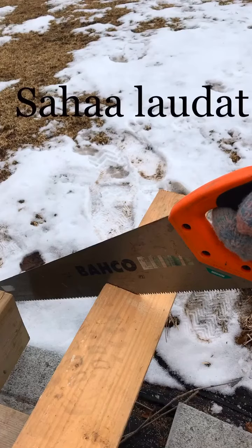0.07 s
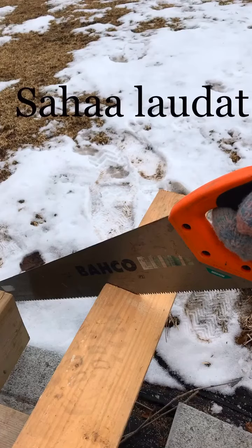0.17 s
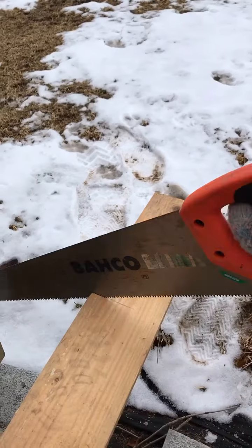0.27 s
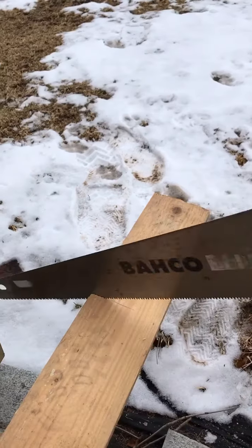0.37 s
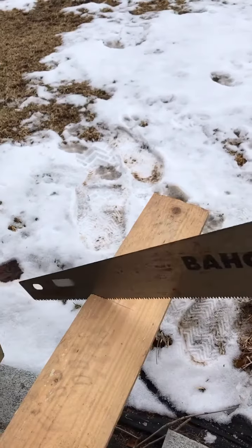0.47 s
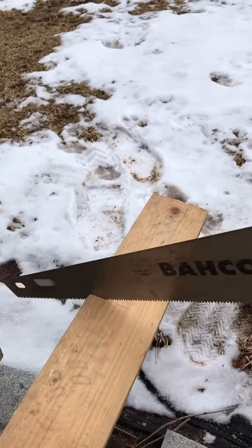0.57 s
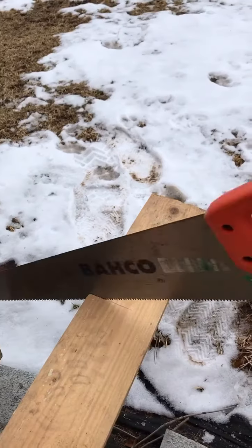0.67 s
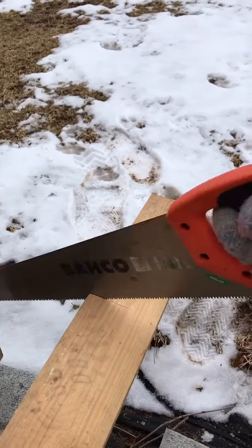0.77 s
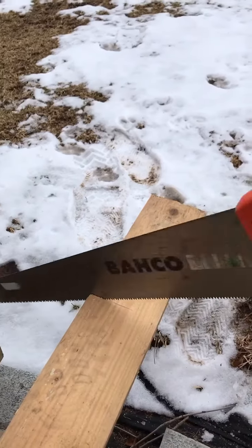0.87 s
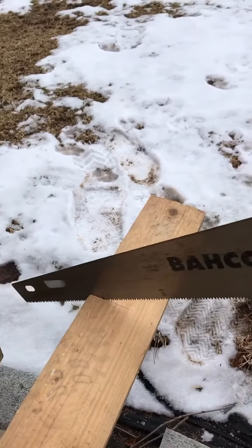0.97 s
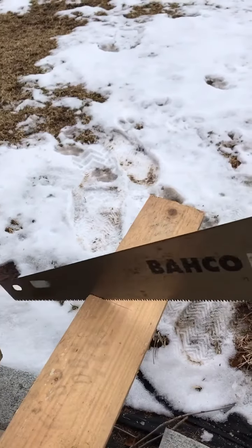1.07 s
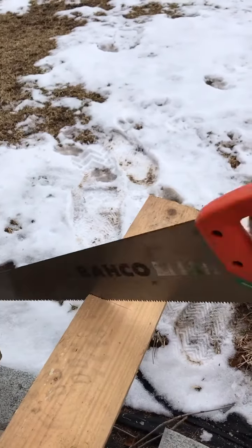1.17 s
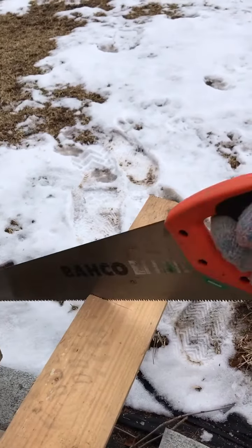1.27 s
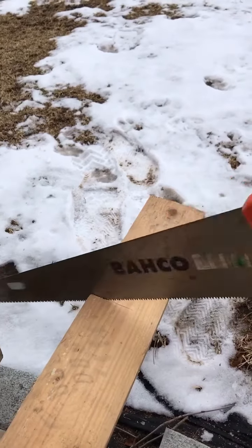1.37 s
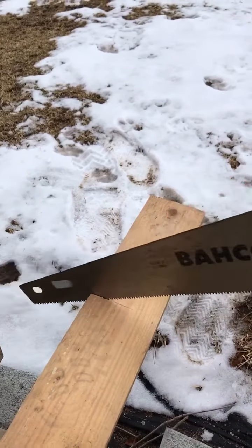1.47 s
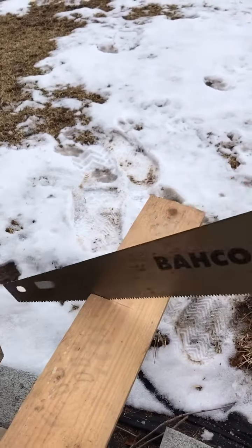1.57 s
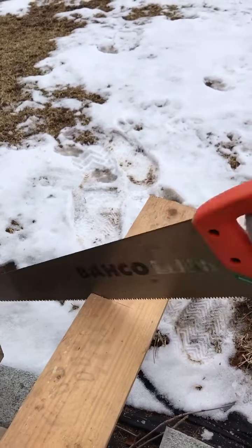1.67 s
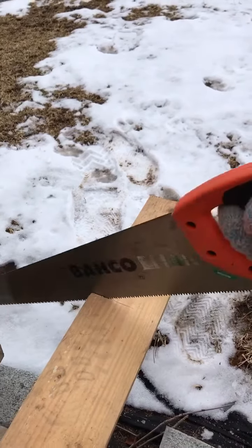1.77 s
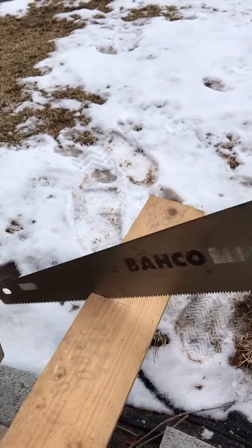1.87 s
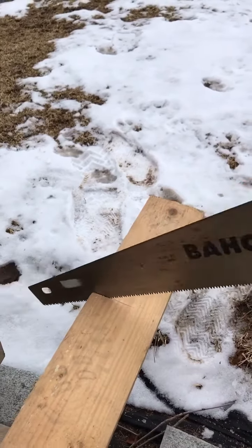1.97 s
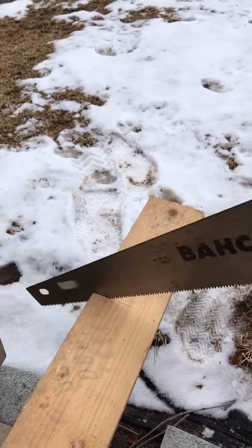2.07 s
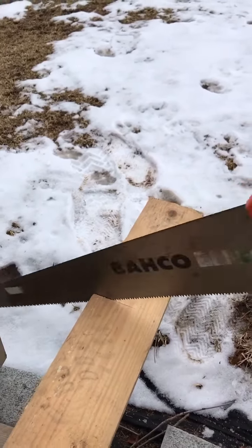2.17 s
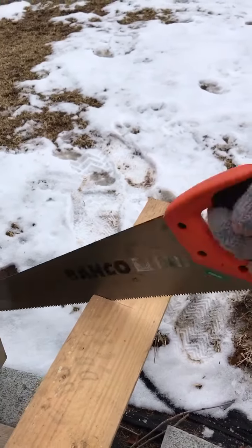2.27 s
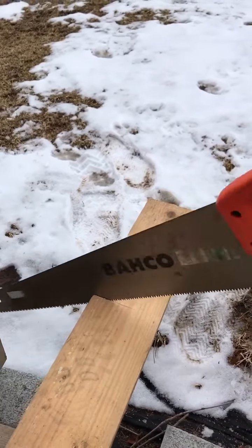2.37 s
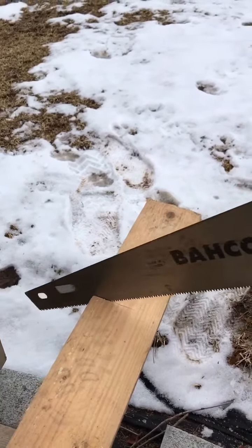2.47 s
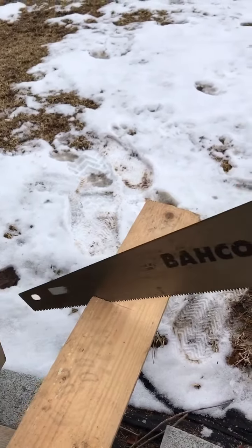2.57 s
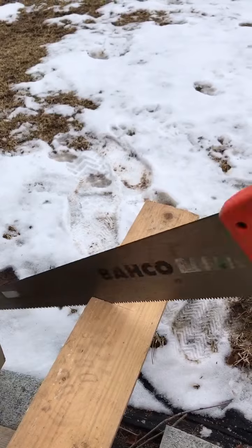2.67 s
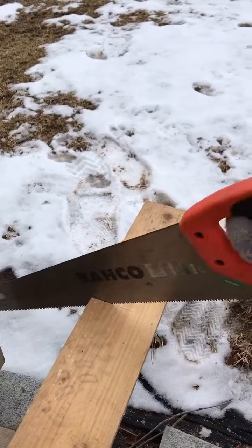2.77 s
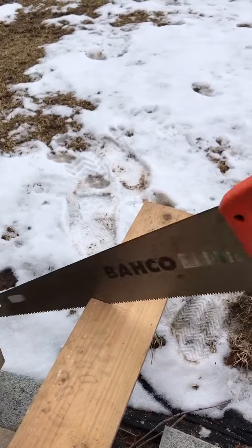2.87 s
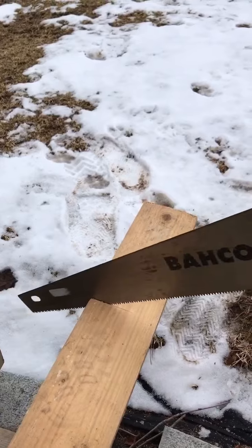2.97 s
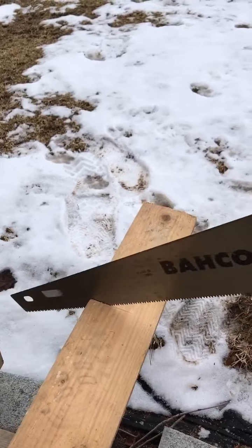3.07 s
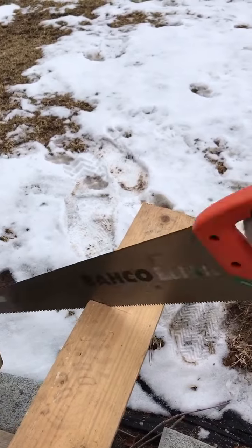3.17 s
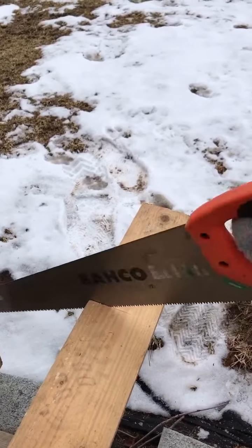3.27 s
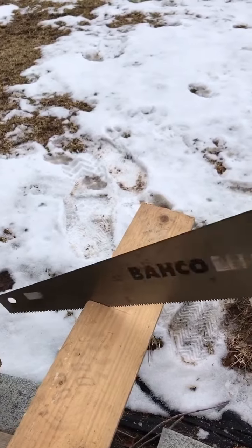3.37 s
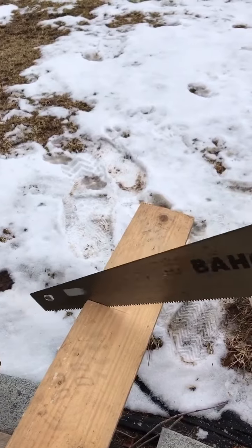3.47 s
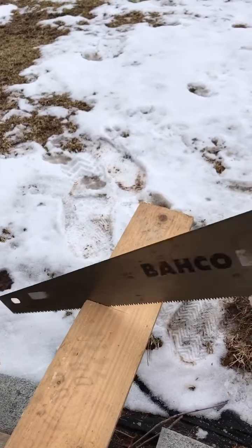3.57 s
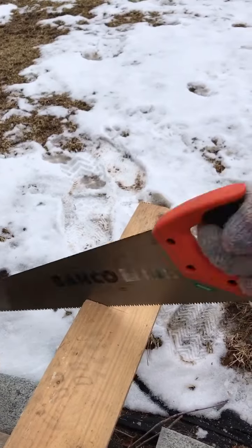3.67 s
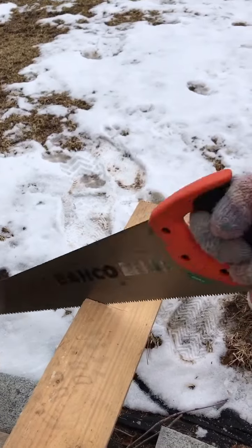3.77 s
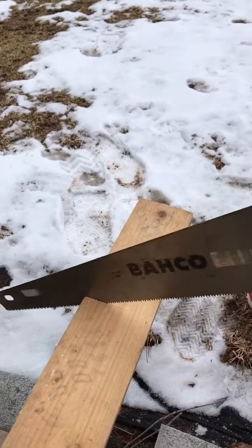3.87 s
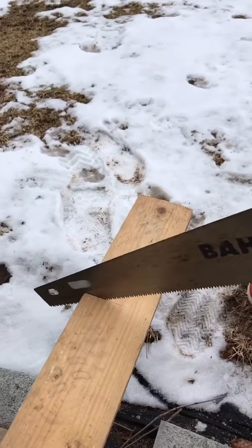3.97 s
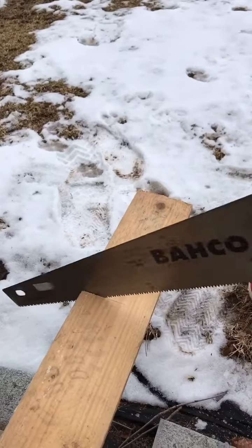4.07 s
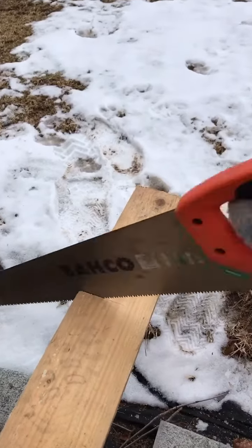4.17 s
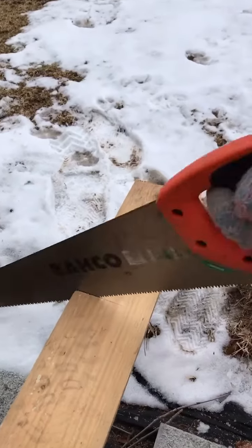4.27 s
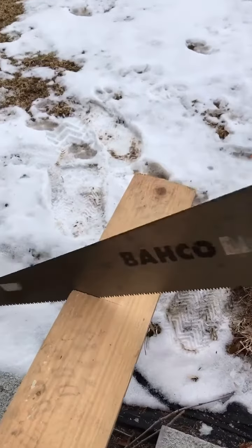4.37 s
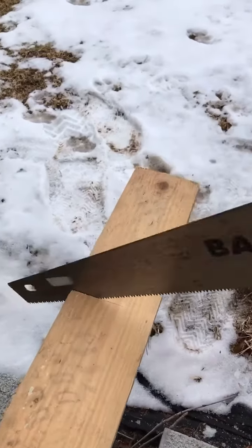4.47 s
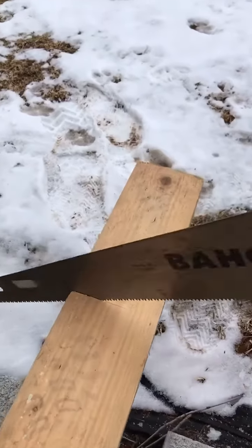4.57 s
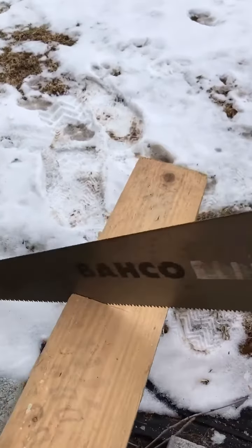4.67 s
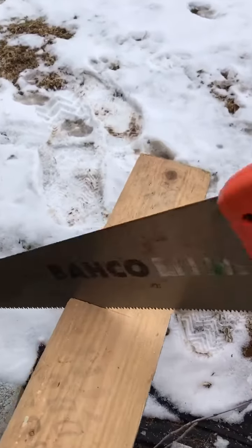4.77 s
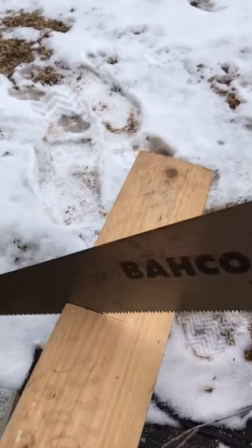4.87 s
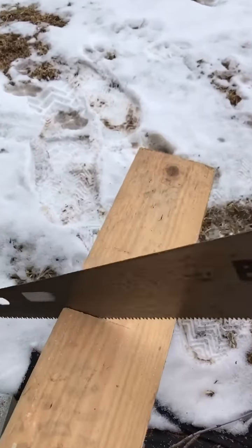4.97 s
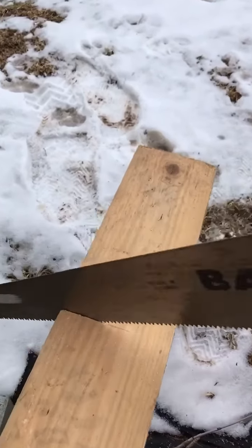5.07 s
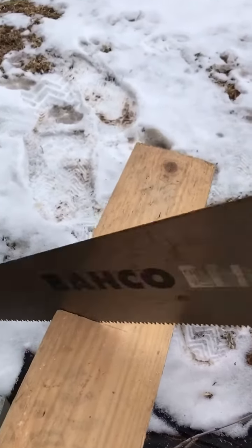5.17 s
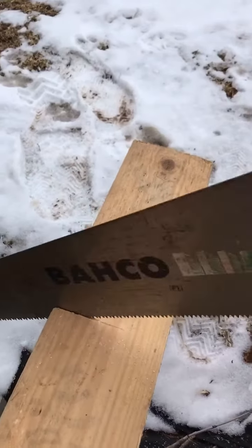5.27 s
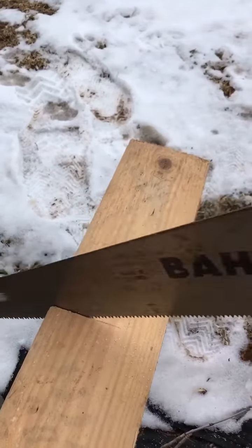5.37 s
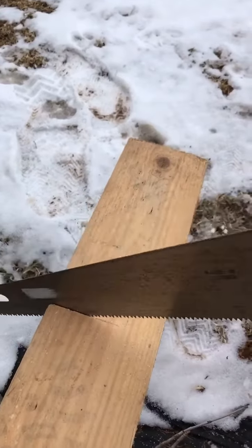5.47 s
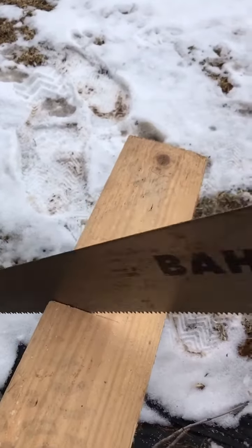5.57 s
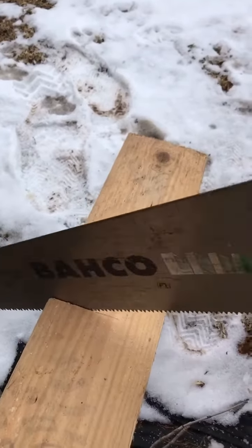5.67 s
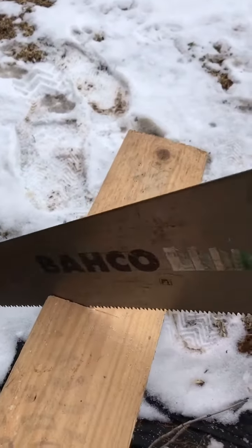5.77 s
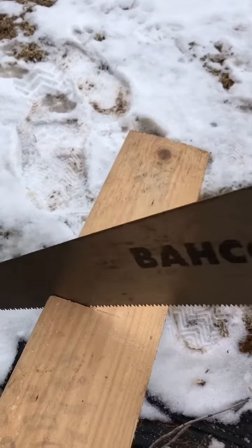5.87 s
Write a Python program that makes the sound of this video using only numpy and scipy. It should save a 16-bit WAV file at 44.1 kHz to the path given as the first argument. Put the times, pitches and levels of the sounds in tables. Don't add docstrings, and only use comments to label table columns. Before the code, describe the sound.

Close, dry outdoor sawing in mono: a toothed steel blade is dragged back lightly, then pushed hard through a plank, over and over without pause. Each push gives a coarse woody rasp with low knocking resonance; each pull is thinner, scratchier and chattering. Bright metallic hiss rides above, and the tone shifts slightly as the cut deepens. Sound begins after a quarter second of silence.

```python
import sys
import numpy as np
from scipy import signal
from scipy.fft import rfft, irfft, next_fast_len
from scipy.io import wavfile
from scipy.ndimage import uniform_filter1d, map_coordinates

SR = 44100
rng = np.random.default_rng(int(sys.argv[2]) if len(sys.argv) > 2 else 0)


def log_audio(samples):
    frames = np.atleast_2d(samples).T
    limited = np.clip(frames, -1, 1)
    pcm = np.round(limited * 32767).astype(np.int16)
    wavfile.write(sys.argv[1], SR, pcm)


def amplitude_ratio(level_db):
    exponent = np.asarray(level_db, float) / 20
    return 10 ** exponent


N = 261051


def unit(x):
    return x / np.sqrt(np.mean(x ** 2) + 1e-20)


def curves(rows):
    s, *columns = np.transpose(rows)
    return [np.interp(np.arange(N) / SR, s, column) for column in columns]


def wobble(rate):
    return map_coordinates(rng.standard_normal(int(N * rate / SR) + 4), [np.arange(N) * rate / SR])


def filtered(x, response):
    m = next_fast_len(N + SR // 2)
    return irfft(rfft(x, m) * response(np.fft.rfftfreq(m, 1 / SR)), m)[:N]


def ringing(x, modes):
    def response(f):
        h = 0
        for k, (hz, width, db) in enumerate(modes):
            resonance = 1j * f * width / (hz * hz - f * f + 1j * f * width)
            h = h + (-1) ** k * amplitude_ratio(db) * resonance
        return h / np.sqrt(np.mean(np.abs(h) ** 2))
    return filtered(x, response)


def steady(x, span_s):
    return x / np.sqrt(np.abs(uniform_filter1d(x ** 2, int(span_s * SR))) + 1e-9)


# (frequency [Hz], level [dB per Hz])
OUTDOORS = [(20, -120), (60, -9), (300, 13.5), (1000, 5), (5000, -7), (15800, -30)]


def air():
    hz, db = np.transpose(OUTDOORS)
    spectrum = lambda f: amplitude_ratio(np.interp(np.log(f + 1), np.log(hz), db))
    return amplitude_ratio(-51.0) * unit(filtered(rng.standard_normal(N), spectrum))


# (time [s], level [dB])
ROCKING = [(0.27, -67), (0.32, -51), (0.87, -40.5), (1.14, -58), (1.73, -46), (2.08, -51), (2.13, -40),
           (2.28, -50), (3.4, -46), (3.43, -53), (4.14, -41), (4.19, -52), (4.5, -40), (4.64, -55),
           (4.93, -42), (4.97, -50), (5.81, -52.5), (5.92, -42)]


def support():
    level_db, = curves(ROCKING)
    bending = ringing(rng.standard_normal(N), [(58.1, 7.5, 0)])
    return amplitude_ratio(level_db + 4.5) * steady(bending, 0.18)


# (time [s], full-speed tooth rate [1/s], skew of the speed arc [power],
# share of regular bites [0-1])
STROKES = [(.254, 390, 0.84, 0), (.494, 400, 0.96, 0.33), (.753, 387, 1.1, 0.05), (1.003, 452, 1.06, 0.45),
           (1.25, 350, 1, 0.07), (1.497, 440, 0.87, 0.28), (1.735, 446, 0.94, 0.05),
           (2.012, 408, 1.25, 0.49), (2.277, 397, 1.02, 0), (2.514, 450, 1.01, 0.44), (2.776, 446, 1, 0.15),
           (3.024, 408, 0.98, 0.42), (3.245, 360, 0.94, 0.12), (3.488, 454, 1.25, 0.64),
           (3.729, 374, 0.88, 0.04), (3.982, 414, 1.25, 0.62), (4.233, 380, 1.1, 0.12),
           (4.484, 397, .9, 0.5), (4.751, 400, 0.99, 0.07), (5.0, 388, 1.31, 0.53), (5.224, 366, 0.88, .1),
           (5.468, 374, 1.1, 0.61), (5.718, 343, 1, 0.02), (5.96, 390, 1.3, 0.15)]


def teeth():
    s, rate, skew, share = np.transpose(STROKES)
    t = np.arange(N) / SR
    k = np.clip(np.searchsorted(s, t) - 1, 0, len(s) - 2)
    along = np.clip((t - s[k]) / (s[k + 1] - s[k]), 0, 1)
    speed = np.abs(np.sin(np.pi * along ** skew[k])) ** .65
    passed = np.cumsum(rate[k] * speed * (1 + .02 * wobble(40))) / SR
    bite = np.diff(np.floor(passed), prepend=0) * amplitude_ratio(1.5 * rng.standard_normal(N))
    bite = bite - uniform_filter1d(bite, SR // 50)
    return steady(bite, 0.022), share[k], passed


# (cut at mid-stroke [dB], swell of the cut over the stroke [dB], late start [s],
# early stop [s], scrape left in the reversal before it [dB])
FORCE = [(-28, 14.5, 0.0022, 0.014, -58), (-18.5, 8, 0.0025, 0.01, -57), (-28, 11.5, 0.0033, 0.006, -64),
         (-18.5, -2.5, 0.0061, 0.002, -57), (-26.5, 11.5, 0.008, 0.0043, -63), (-19, 6.5, 0.00058, 0, -57),
         (-26.5, 9, 0.0085, .013, -63), (-18, 12, 0.011, 0.016, -59), (-29.5, 10, 0.0042, 0.0064, -57),
         (-22, 0.5, 0.0045, 0.023, -56.5), (-29.5, 9.5, 0.014, 0.0013, -72), (-19, 7, -0.0024, 0.027, -57),
         (-28.5, 14, 0.0032, 0.006, -76), (-17.5, 8, -0.013, 0.0096, -59), (-25, 12, 0.021, 0.0043, -50.5),
         (-19, 6, -0.0095, .008, -58), (-27, 16.5, 0.0017, 0.0075, -57.5),
         (-19.5, 3.5, -0.00038, 0.0064, -55), (-27, 11, 0.0022, -0.00053, -57),
         (-17, 9, -0.0012, 0.0085, -55.5), (-26, 17.5, -0.0048, 0.0053, -56),
         (-17.5, 7, -0.003, 0.011, -58), (-26.5, 30, -0.015, -0.026, -55.5)]
# (blade hiss re cut [dB], board boom [dB], swell of the boom [dB], judder [dB])
SHAKEN = [(-6, -35.5, 2, -41), (-10, -26, 0, -30.5), (-5, -38, 5, -40.5), (-10, -24, -5, -34.5),
          (-6, -36, -5, -48), (-10, -23, -3, -25.5), (-6, -39.5, -4, -39.5), (-10.5, -25, 7.5, -25.5),
          (-3.5, -42, 6, -42), (-7.5, -22, 7.5, -25), (-6.5, -37.5, 22, -38), (-10, -24.5, 3, -32.5),
          (-7, -37, 10, -40), (-9.5, -25, -4, -39), (-6.5, -37.5, 1, -38.5), (-9.5, -24.5, 2, -36),
          (-5, -34, 17, -39), (-9.5, -23, -6.5, -34), (-5, -43, -4, -47), (-9.5, -26, -3, -45),
          (-4.5, -39.5, 24, -40), (-8.5, -25.5, 0, -39), (-5, -38.5, 51, -44)]


def effort():
    cut_grows, hiss_grows, boom_grows, judder_grows = (0.95, 1.42), (1, 1.3), (0.29, 0.76), (.12, 1)
    hiss_swell_db = (-6, 3.5)
    boom_ease_db = (1.5, -5)
    chatter_db = (8.5, 4)
    boom_rest, judder_rest = 0.032, 0.031
    scrape_wood_db, scrape_steel_db = 11.5, 4
    s, t = np.transpose(STROKES)[0], np.arange(N) / SR
    k = np.clip(np.searchsorted(s, t) - 1, 0, len(FORCE) - 1)
    cut_db, swell_db, late_s, early_s, _ = np.transpose(FORCE)[:, k]
    hiss_db, boom_db, boom_swell_db, judder_db = np.transpose(SHAKEN)[:, k]
    scrape = amplitude_ratio(np.interp(t, s[:-1], np.transpose(FORCE)[-1]))
    start_s, stop_s = s[k] + late_s, s[k + 1] - early_s
    along = np.clip((t - start_s) / (stop_s - start_s), 0, 1)
    speed = np.abs(np.sin(np.pi * along))

    def way(pair):
        return np.array(pair)[k % 2]

    def layer(db, swell, rest, grows):
        return amplitude_ratio(db + swell * (along - .5)) * (speed + rest) ** way(grows)

    cut = np.hypot(layer(cut_db, swell_db, 0, cut_grows), amplitude_ratio(scrape_wood_db) * scrape)
    hiss = layer(cut_db + hiss_db, swell_db + way(hiss_swell_db), 0, hiss_grows)
    hiss = np.hypot(hiss, amplitude_ratio(scrape_steel_db) * scrape)
    boom_db = boom_db + way(boom_ease_db) * (speed ** 2 - .5)
    boom = layer(boom_db, boom_swell_db, boom_rest, boom_grows)
    judder = layer(judder_db, 0, judder_rest, judder_grows)
    chatter = amplitude_ratio(way(chatter_db)) * cut
    return [uniform_filter1d(gain, size=300) for gain in (cut, hiss, boom, judder, chatter)]


def fibres(spiky_db):
    clumps = amplitude_ratio(.8 * wobble(25) + 1.5 * wobble(70) + .6 * wobble(300))
    return unit(rng.standard_normal(N) * amplitude_ratio(spiky_db * rng.standard_normal(N)) * clumps)


# (time [s], peak in the steel [dB], wood re steel [dB])
HOPS = [(0.2748, -27, -10), (0.284, -27, -7), (0.2938, -12, -14), (0.3877, -25, -5), (0.8086, -11, -11),
        (0.8231, -8, -16), (0.855, -15, -15), (1.034, -25, -2), (1.5205, -16, -14), (1.563, -16, -1),
        (1.7769, -14.5, -12), (2.3521, -12.5, -3), (2.5751, -17, -11), (3.012, -33, -4), (3.0563, -27, 4),
        (3.6377, -9, -9), (3.799, -12.5, -2), (4.141, -7, -12), (4.5137, -17.5, 1), (4.5282, -16, -3),
        (4.8312, -25, -10), (4.8821, -14, -13), (5.1442, -10.5, -12), (5.254, -17, -5), (5.8681, -7.5, -2)]
# (first landing [s], gap [s], landings [count], level re chatter [dB])
BOUNCES = [(0.2936, 0.019, 4, 5), (.5746, 0.013, 4, -5), (1.3189, 0.018, 5, -4), (1.5719, 0.019, 4, 4.5),
           (2.0942, 0.015, 5, 0), (2.4027, 0.016, 2, -3), (2.6389, 0.015, 2, 2), (3.082, 0.008, 2, 0),
           (3.3094, 0.017, 6, 5), (3.5162, 0.021, 3, 0), (3.8227, 0.016, 5, 5), (4.2957, .0213, 3, 1),
           (4.5557, .0247, 2, 2), (5.0684, 0.028, 4, 3.5), (5.2999, 0.021, 2, 2), (5.3627, .0155, 3, 4.5),
           (5.5542, 0.016, 3, -2.5), (5.8477, 0.024, 3, 5)]


def hops(t60, chatter):
    stray_gap_s, spread_db = .1, 1.5
    steel, wood, t = np.zeros(N + SR), np.zeros(N + SR), np.arange(SR // 20) / SR
    trains = [(s + i * gap, db) for s, gap, count, db in BOUNCES for i in range(round(count))]
    stray_times = np.cumsum(stray_gap_s * np.exp(.5 * rng.standard_normal(90)))
    strays = [(s, 0) for s in stray_times if s * SR < N]
    when, db = np.transpose(trains + strays)
    size_db, wood_db = spread_db * rng.standard_normal((len(when), 2)).T
    chatter_db = 20 * np.log10(np.interp(when, np.arange(N) / SR, chatter))
    light_hops = np.transpose([when, db + size_db + chatter_db, wood_db])
    envelope = amplitude_ratio(-60 * t / t60) * (1 - np.exp(-t / 0.00017))
    for s, db, wood_db in [*HOPS, *light_hops]:
        burst = envelope * rng.standard_normal(len(t))
        start = round(s * SR)
        steel[start:start + len(t)] += amplitude_ratio(db - 15) * burst
        wood[start:start + len(t)] += amplitude_ratio(db + wood_db - 9.0) * burst
    return steel[:N], wood[:N]


# (time [s], depth [0 shallow, 1 halfway, 2 deep])
DEPTH = [
    (2.4, 0),
    (2.9, 1),
    (4.1, 1),
    (4.5, 2),
]
# (frequency [Hz], width [Hz], level shallow [dB], level halfway [dB], level deep [dB])
WOOD = [(501, 79, -13.5, -13.5, -9.5), (777, 74, -5, -6.5, -1), (832, 57, -6, -10, 2),
        (958, 79, -6.5, -6, -1.5), (1119, 56.5, 0.5, -0.5, 1), (1336, 54, -5.5, -4.5, -4.5),
        (1455, 74, -7.5, -5, -9.5), (1577, 28, -1.5, -3, -7.5), (1695, 60, -7.5, -6, -0.5),
        (1918, 148, -6, -5, -5.5), (2075, 100, -5, -2.5, -5), (2360, 115, -6, -5.5, -2),
        (2692, 146, -10, -8.5, -5.5), (2904, 157, -8.5, -9, -7), (3264, 310, -10, -8.5, -9.5),
        (3907, 300, -11.5, -11.5, -12), (3948, 113, -6, -11, -9.5)]


def board(force):
    depth, = curves(DEPTH)
    out = 0
    for k in range(3):
        modes = [(hz, width, levels[k]) for hz, width, *levels in WOOD]
        out = out + np.sqrt(np.clip(1 - np.abs(depth - k), 0, 1)) * ringing(force, modes)
    return out


def patchy(x, depth_db):
    z = signal.stft(x, nperseg=512)[2]
    field = uniform_filter1d(rng.standard_normal(z.shape), size=3, axis=0)
    field = uniform_filter1d(field, size=9, axis=1)
    gain = amplitude_ratio(depth_db * unit(field))
    return signal.istft(z * unit(gain), nperseg=512)[1][:N]


# (frequency [Hz], width [Hz], level [dB])
BOOM = [(139, 20, -5), (188, 49, -4.5), (229.6, 17.6, 6), (285, 22, -3.5), (333, 39, -4),
        (422.3, 29.8, -3.5)]
# (frequency [Hz], width [Hz], level [dB])
STEEL = [(3956, 500, -1.5), (4690, 330, -2.5), (4890, 155, -7), (5130, 820, -1.5), (6110, 1100, -1.5),
         (6940, 650, -1), (8500, 1420, -5.5), (9850, 1220, -4.5), (11400, 1300, -4.5), (13040, 1400, -1.5),
         (14070, 1560, -3), (16100, 1100, -6.5)]
# (frequency [Hz], width [Hz], level [dB])
BLADE = [(1157, 7.5, 1.5), (1549, 32, 0.5), (1645, 30, -10.5)]


def saw():
    cut_gain, hiss_gain, boom_gain, judder_gain, chatter = effort()
    bite, share, passed = teeth()
    biting = np.clip(3.94 * share - .4, 0, 1)

    swing = np.sqrt(2) * np.sin(2 * np.pi * np.cumsum(117 * (1 + 0.0483 * wobble(14))) / SR)
    loose = steady(ringing(rng.standard_normal(N), [(138, 46, 0)]), 0.013)
    judder = 0.65 * biting * swing + (1 - 0.65 * biting) * loose
    shake = 1 + 0.12 * judder * np.clip(0.68 * judder_gain / cut_gain, 0, 1)

    skip = np.exp(-2.5 * ((passed / 5 + .25 * wobble(30)) % 1))
    tear = shake * (biting + (1 - biting) * unit(0.96 + skip)) * fibres(spiky_db=1.5)

    def force(bite_db):
        return np.sqrt(share) * amplitude_ratio(bite_db) * bite + np.sqrt(1 - share) * tear

    steel_hop, wood_hop = hops(t60=0.023, chatter=chatter)

    hum = share * amplitude_ratio(2.5 * wobble(30)) * np.sin(2 * np.pi * passed)
    push = amplitude_ratio(0.5) * boom_gain * force(-3.5 - 23 * (1 - biting))
    boom = ringing(push, BOOM) + amplitude_ratio(-7.5) * cut_gain * hum
    boom = boom * amplitude_ratio(2.27 * wobble(18))

    pressed = filtered(force(-5.5), lambda f: 1.292 * 2600 / (2600 + 1j * f))
    wood_force = biting * pressed + (1 - biting) * force(-12.0)
    cut = board(amplitude_ratio(-1.0) * cut_gain * wood_force + wood_hop)

    hiss = ringing(amplitude_ratio(0.5) * hiss_gain * force(-7.5) + steel_hop, STEEL)
    bend = np.diff(hiss, n=2, prepend=0, append=0)
    hiss = hiss - 0.056 * curves(DEPTH)[0] * bend
    ring = ringing(amplitude_ratio(-17.0) * cut_gain * tear, BLADE)
    wood_and_steel = patchy(cut, depth_db=1.5) - patchy(hiss, depth_db=1.5)
    return boom + ring + wood_and_steel + amplitude_ratio(-2.5) * judder_gain * judder


def scene():
    return (air() + support() + saw())[None]


def roll_off(x):
    return signal.sosfilt(signal.butter(12, 16920, fs=SR, output="sos"), x)


def record(dry):
    start_s, fade_s, bass_hz, top_hz = 0.2636, 0.024, 35, 15830
    fade = np.clip((np.arange(N) / SR - start_s) / fade_s, 0, 1)
    microphone = lambda f: (1j * f / (bass_hz + 1j * f)) ** 2 * (f < top_hz)
    mix = fade * filtered(dry[0], microphone)[None]
    return roll_off(mix)


dry = scene()
out = record(dry)
log_audio(out)
```